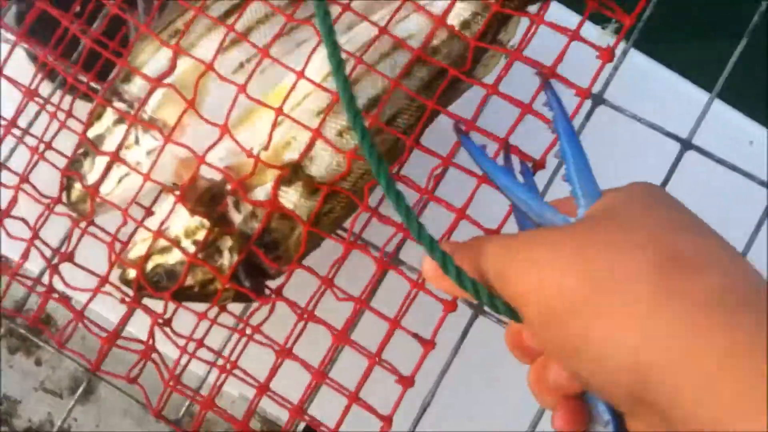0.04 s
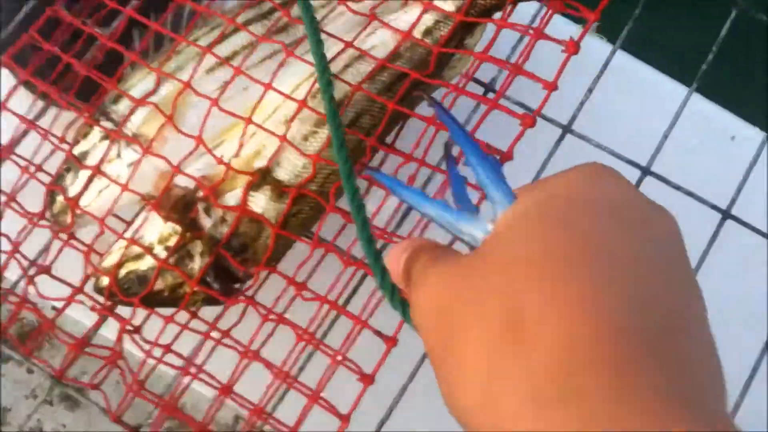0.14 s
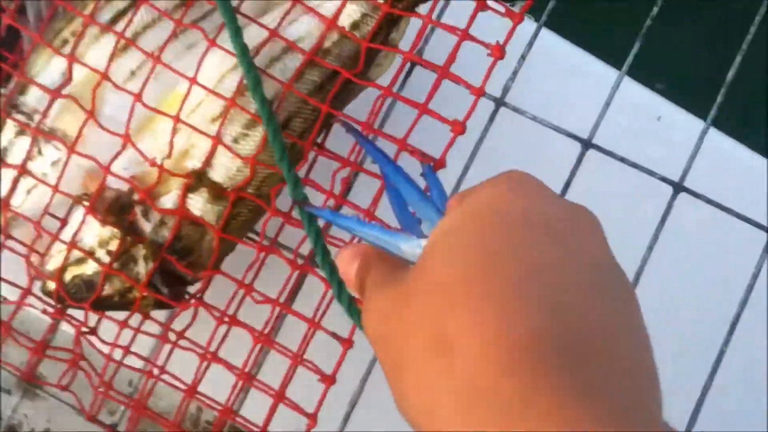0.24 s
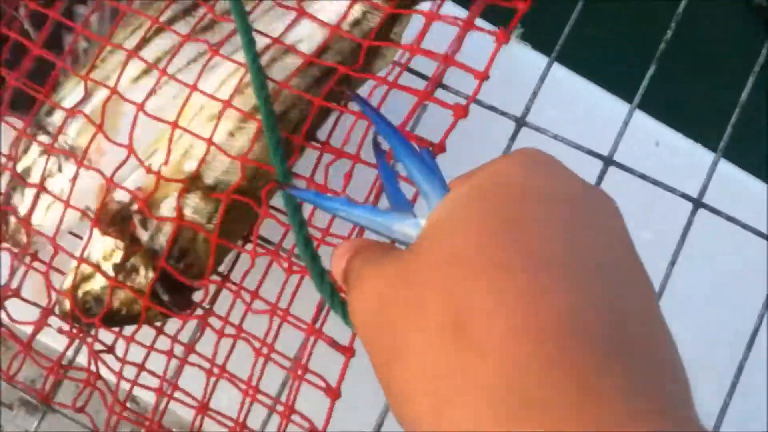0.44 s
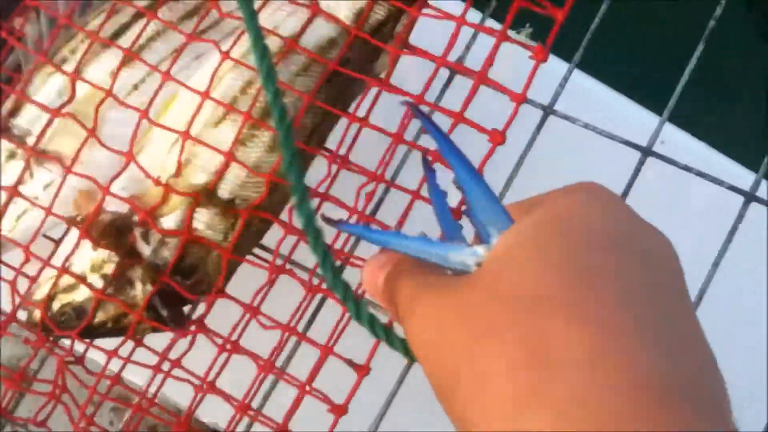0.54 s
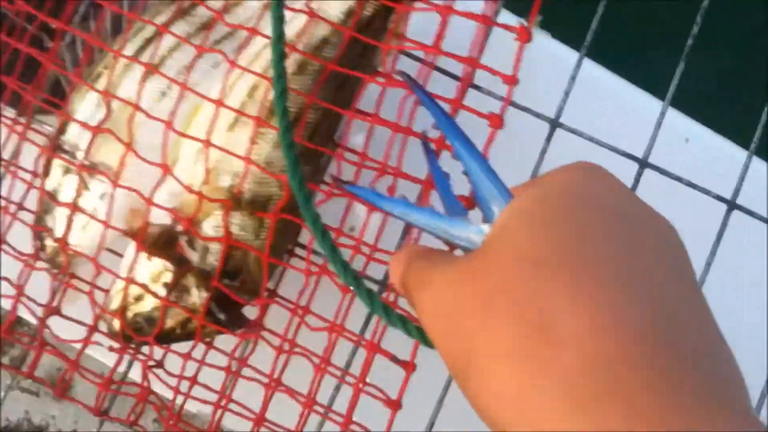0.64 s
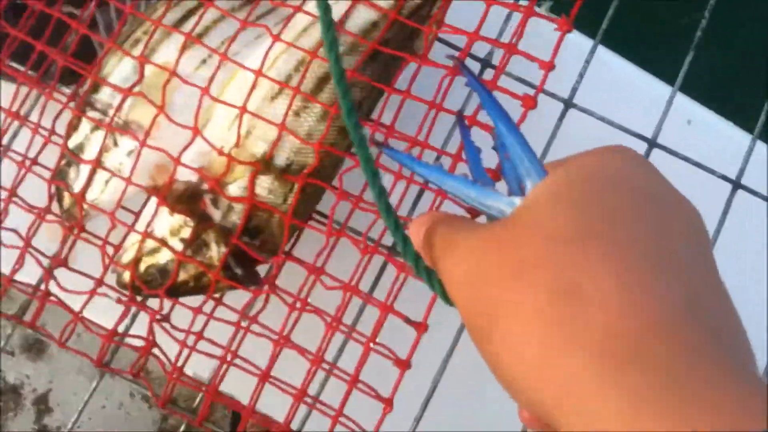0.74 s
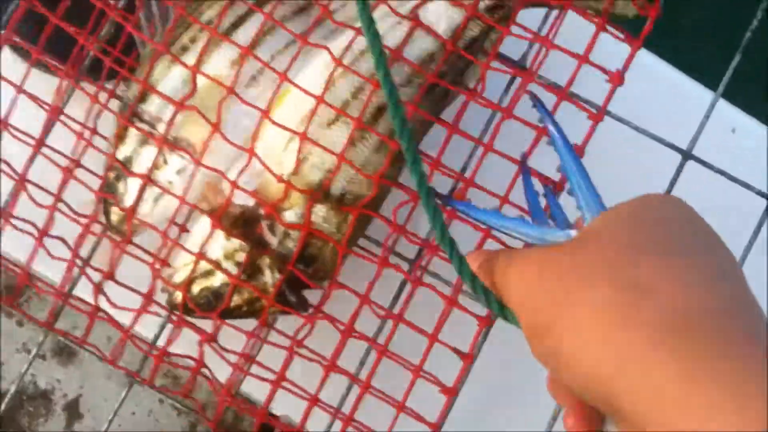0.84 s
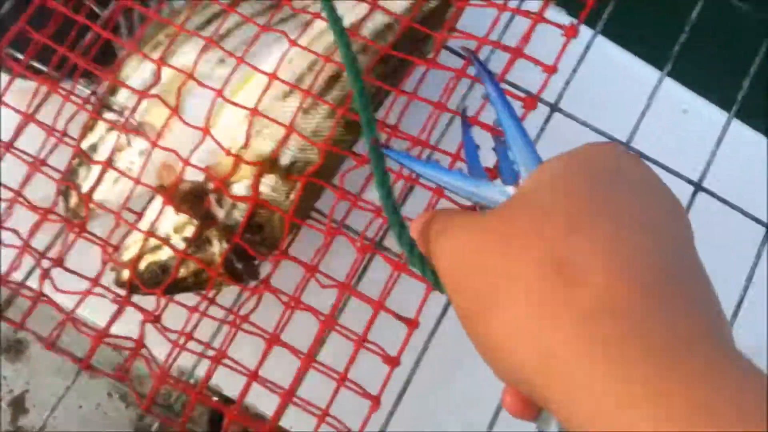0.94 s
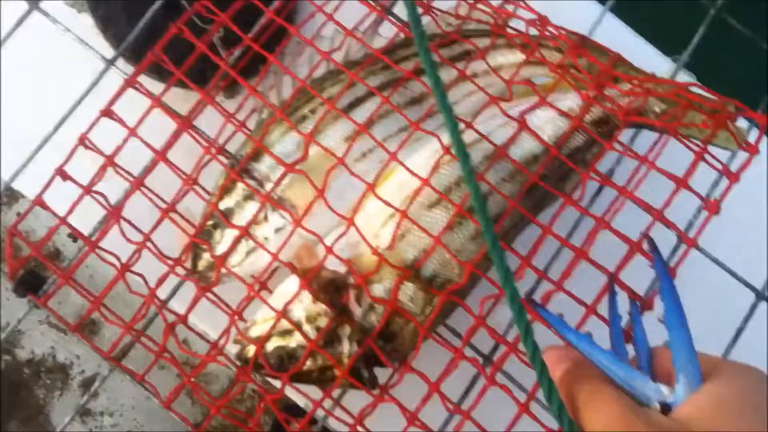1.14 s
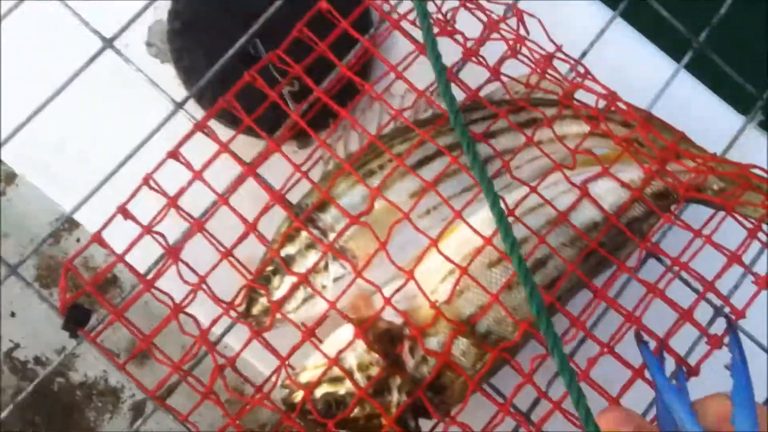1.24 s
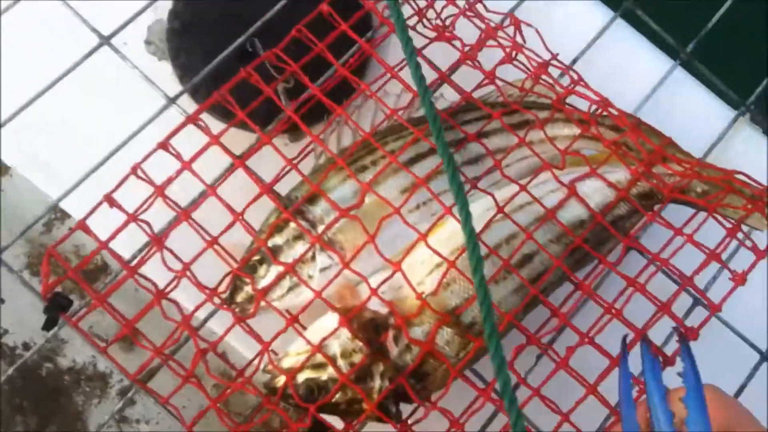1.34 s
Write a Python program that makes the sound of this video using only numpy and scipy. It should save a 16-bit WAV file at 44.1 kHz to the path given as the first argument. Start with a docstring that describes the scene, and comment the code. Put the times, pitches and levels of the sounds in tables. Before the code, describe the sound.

Close, dry clacks and crunchy mesh rattles as a crab is shifted over a hollow lid

```python
"""A hard-shelled crab in a plastic mesh net is shifted by hand on a hollow plastic lid, close to a phone.
Its knocks excite damped modes: clicks and noise ring the shell, and the lid booms a moment later.
Mesh strands rattle in showers of random clicks; claw tips and knots give ticks of a few cycles.
Dragging is shaped noise (rustle, fizz, lid rumble); scrapes are resonant rubbing, and a wire grid
rings when claws catch it. A faint low outdoor hush lies beneath."""
import sys
import numpy as np
from scipy import signal
from scipy.fft import rfft, irfft
from scipy.io import wavfile
from scipy.ndimage import uniform_filter1d

SR = 44100
rng = np.random.default_rng(int(sys.argv[2]) if len(sys.argv) > 2 else 0)


def dump_mix(stems):
    """Bounce the given channels to the path in sys.argv[1] as a 16-bit WAV at rate SR."""
    frames = np.atleast_2d(stems).T  # one column per channel
    limited = np.clip(frames, -1, 1)  # hard clip at full scale
    pcm = np.round(limited * 32767).astype(np.int16)
    wavfile.write(sys.argv[1], SR, pcm)


def how_loud(loudness_db):
    """Turn decibels into a plain amplitude multiplier (0 dB gives 1, 20 dB gives 10)."""
    steps = np.asarray(loudness_db, float) / 20
    return 10 ** steps


N = 61739
SPAN = int(0.3 * SR)  # samples in one event

# modes of the hollow lid: mode_hz, level_db, t60_s
LID = [(156.3, -15.5, 0.37), (255, -9, 0.09), (273.5, -10.5, 0.22), (349.4, 6.5, 0.047),
       (406.2, -14.5, 0.26), (499.8, -14.5, 0.13), (660, -12, 0.057), (889, -14.5, 0.15)]
# modes of the crab's shell: mode_hz, level_db, t60_s
SHELL = [(1398, -2, .04), (1892, -2.5, 0.06), (2096, -2.5, 0.016), (2300, -6, 0.083), (2704, -6.5, 0.051),
         (2952, -4.5, 0.041), (3350, -1.5, 0.023), (3616, 1.5, 0.028), (3903, -4, 0.023), (4313, -2, 0.027),
         (4620, -2.5, 0.015), (5100, 0.5, 0.023), (5800, -7.5, 0.037), (6470, -6, 0.0099)]


def unit(x):
    """Normalisation to an rms value of one."""
    return x / np.sqrt(np.mean(x ** 2) + 1e-30)


def peak(x, db):
    """Normalisation by short-time power: the loudest 4 ms get this rms level."""
    loudest_power = uniform_filter1d(x ** 2, size=176).max()
    return x * how_loud(db) / np.sqrt(loudest_power + 1e-30)


def fade(t60, count=SPAN):
    """Exponential decay, falling 60 dB in t60 seconds."""
    return np.exp(-np.log(1000) * np.arange(count) / SR / max(t60, 1e-4))


def colour(x, table):
    """Spectral shaping: gains in dB interpolated over log frequency."""
    hz = np.fft.rfftfreq(len(x), 1 / SR)
    points = np.array(table)
    gain_db = np.interp(np.log(hz + 1), np.log(points[:, 0]), points[:, 1])
    return irfft(rfft(x) * how_loud(gain_db), len(x))


def band(x, hz, width):
    """Two-pole resonance, its bandwidth a share of the centre frequency."""
    return signal.lfilter(*signal.iirpeak(min(hz, 0.45 * SR), 1 / width, fs=SR), x)


def clicks(count):
    """Random impulse train: dense contacts of random sign and uneven size."""
    per_s, spread_db, top_db = 4000, 3, 9
    chance, side, size = rng.random((count, 3)).T
    size_db = np.minimum(-spread_db * np.log(1 - size), top_db)
    return (chance < per_s / SR) * np.sign(side - 0.5) * how_loud(size_db)


def ring(x, modes):
    """Modal synthesis: damped sines driven by x; each contact point favours other modes."""
    scatter_db, scatter_share = 3, 0.008  # standard deviations of mode level and frequency
    t = np.arange(SPAN) / SR
    scatter = rng.standard_normal((len(modes), 2))
    body = np.zeros(SPAN)
    for (hz, db, t60), (a, b) in zip(modes, scatter):
        sine = np.sin(2 * np.pi * hz * (1 + scatter_share * b) * t)
        body += how_loud(db + scatter_db * a) * fade(t60) / np.sqrt(t60) * sine
    return signal.fftconvolve(x, body)[:len(x)]


def shell(x):
    """Modal density: named shell modes plus the many small resonances of mesh and shell between them."""
    diffuse_db, diffuse_t60_s = -1, 0.014
    dense = band(rng.standard_normal(SPAN), 2020, 1.0) * fade(diffuse_t60_s)
    diffuse = unit(signal.fftconvolve(x, dense)[:len(x)])
    return unit(ring(x, SHELL)) + how_loud(diffuse_db) * diffuse


def flicker(db, per_s, count):
    """Random amplitude modulation: slewed random level steps that make a layer uneven."""
    step = int(SR / per_s)
    levels = np.repeat(rng.standard_normal(N // 100), step)[:count]
    return how_loud(db * uniform_filter1d(levels, size=step // 2))


def add(out, s, x):
    """Linear superposition of one event, starting at s seconds."""
    i = max(int(s * SR), 0)
    out[i:i + SPAN] += x[:N - i]


def drag():
    """Friction noise of the dragged net: mesh rustle and fizz over a lid damped by the weight on it."""
    # course of the dragging: time_s, rustle_db, rumble_db, fizz_db
    course = np.array([(0.0, -50, -61.5, -77), (0.198, -69.5, -52.5, -63.5), (0.276, -53, -53.5, -69),
                       (0.368, -76.5, -67, -63.5), (0.459, -34.5, -38.5, -57), (0.531, -45.5, -56, -54.5),
                       (0.59, -58, -39.5, -55.5), (0.699, -47.5, -38.5, -57.5), (0.781, -48, -47.5, -56.5),
                       (0.86, -90, -73, -74), (0.964, -53, -57, -76), (1.127, -51.5, -50.5, -72),
                       (1.279, -63.5, -55, -62), (1.4, -65.5, -65, -76)])
    # spectrum of the mesh rustle: frequency_hz, level_db (per Hz)
    rustle_tone = [(290, -31), (500, -2.5), (1270, 1), (2060, -3), (2440, -1.5), (4680, -7), (9000, -27.5),
                   (11700, -69), (19800, -120)]
    # spectrum of the fine treble fizz: frequency_hz, level_db (per Hz)
    fizz_tone = [(3530, -25), (6000, -3.5), (10200, -9.5), (14300, -1), (16200, 0), (16500, -48)]
    t = np.arange(N) / SR
    rustle = unit(colour(rng.standard_normal(N) + 1.4 * unit(clicks(N)), rustle_tone))
    fizz = unit(colour(rng.standard_normal(N) + 1.4 * unit(clicks(N)), fizz_tone))
    fizz = fizz * flicker(2.5, 40, N)  # dB, steps per second
    # the loaded lid rings shorter, with its mode levels drawn together
    loaded_lid = [(hz, 0.81 * db, 0.77 * t60) for hz, db, t60 in LID]
    rumble = unit(ring(rng.standard_normal(N), loaded_lid))
    out = np.zeros(N)
    for layer, level_db in zip((rustle, rumble, fizz), course.T[1:]):
        out += how_loud(np.interp(t, course[:, 0], level_db)) * layer
    return out


def air():
    """Stationary shaped noise: a faint low outdoor hush."""
    # spectrum of the hush: frequency_hz, level_db (per Hz)
    air_tone = [(20, 1), (60, 16), (110, 1), (200, 7), (600, -26), (1200, -59)]
    return how_loud(-61.5) * unit(colour(rng.standard_normal(N), air_tone))


def rattles():
    """Stick-slip of strands over shell: a shower of clicks, partly ringing the shell."""
    # showers of mesh clicks: start_s, level_db, centre_hz, hold_s, t60_s
    showers = [(.001, -43, 3320, 0.011, 0.039), (0.075, -54, 12200, 0.0058, 1),
               (0.424, -18, 4930, 0.015, 0.2), (0.531, -34, 13300, 0.0066, 0.13),
               (0.591, -51, 8900, 0.0018, 0.036), (0.647, -35, 5100, 0.0082, 0.15),
               (0.688, -46, 14300, 0.008, 0.054), (0.883, -23.5, 4140, 0.029, 0.17),
               (1.026, -56, 10700, 0.0038, 0.045), (1.041, -31, 5070, 0.001, 0.015),
               (1.134, -42.5, 5250, 0.0029, 0.28)]
    rise_s, snap, snap_s = 0.0004, 0.69, 0.023
    strands_db, strands_width = -1, 0.57  # level re the body, bandwidth as a share of the centre
    treble_fade = 0.4  # the strands' treble dies in this share of the time
    t = np.arange(SPAN) / SR
    onset = np.minimum(t / rise_s, 1) * (1 + snap * np.exp(-t / snap_s))  # first strands let go hardest
    out = np.zeros(N)
    for s, db, hz, hold, t60 in showers:
        env = how_loud(-60 * np.maximum(t - hold, 0) / t60) * onset
        shower = unit(clicks(SPAN)) + rng.standard_normal(SPAN)
        shower = shower * flicker(4, 250, SPAN)  # uneven lumps: dB, steps per second
        # showers centred above 4500 Hz ring the shell less
        body = unit(shell(band(shower * env, hz, 1.0))) * min(4500 / hz, 1) ** 2
        strands = unit(band(shower * env ** (1 / treble_fade), hz, strands_width))
        add(out, s, peak(body + how_loud(strands_db) * strands, db))
    return out


def ticks():
    """Short wave packets: a few cycles at each tick's pitch with a broadband noise edge."""
    # lone ticks of a claw tip or knot: start_s, level_db, pitch_hz, edge_db (broad edge)
    tick_table = [(.0474, -45.5, 3380, -7), (0.0765, -46.5, 3170, -20), (0.099, -45, 3780, -4),
                  (.240, -51, 8500, 1), (0.598, -42, 7000, -14), (0.6124, -31, 4950, -8),
                  (0.617, -17, 3680, -17), (0.615, -30.5, 5450, -10), (0.778, -40, 3400, -10),
                  (1.083, -48, 8960, 1), (1.150, -40, 3350, -30), (1.286, -59, 3680, -17),
                  (1.297, -54, 5800, -13), (1.322, -47.5, 3300, -14)]
    cycles = 3
    out, t = np.zeros(N), np.arange(SPAN) / SR
    for s, db, hz, edge_db in tick_table:
        n = t * hz / cycles
        edge = how_loud(edge_db) * np.diff(rng.standard_normal(SPAN + 1))  # differencing favours the treble
        packet = (np.sin(2 * np.pi * hz * t) + edge) * n * np.exp(-2 * n ** 2)
        add(out, s, peak(packet, db))
    return out


def scrapes():
    """Friction-driven resonance: rubbing swells and dies, singing in modes near its centre."""
    # slow scrapes of shell along the mesh: start_s, length_s, level_db, strongest_hz
    scrape_table = [(0.116, 0.032, -52.5, 4150), (0.138, 0.049, -48.5, 3870), (.15, 0.051, -47.5, 2270),
                    (0.184, 0.05, -42, 945), (1.221, 0.054, -49, 1310)]
    width = 0.35  # share of the centre frequency
    out, t = np.zeros(N), np.arange(SPAN) / SR
    for s, length, db, hz in scrape_table:
        rub = unit(clicks(SPAN)) * np.sin(np.pi * np.minimum(t / length, 1))
        song = ring(rub, SHELL + LID)
        song = band(band(song, hz, width), hz, width)
        add(out, s, peak(song, db))
    return out


def knocks():
    """Impact excitation: a crack, a dying clatter through the shell, and the lid booming a moment later."""
    # knocks of shell on the lid: start_s, clack_db, boom_db (re clack), strongest_hz, clatter_t60_s
    knock_table = [(0.170, -45.5, 5, 2340, 0.64), (.222, -31.5, -6.5, 3300, 0.13),
                   (0.3584, -27.5, -11, 3700, 0.073), (.374, -29.5, 0, 2590, 0.12),
                   (0.4566, -17, -12, 5150, 0.083), (.531, -40.5, -15, 1800, .05),
                   (0.5652, -27, -10.5, 3650, 0.18), (.602, -30.5, -0.5, 4200, 0.24),
                   (0.631, -30, -6.5, 4120, 0.15), (0.671, -28.5, -5.5, 2450, 0.15),
                   (0.7322, -42, -10, 3500, 0.19), (0.7933, -31.5, 1.5, 4100, 0.15),
                   (0.921, -33.5, 1.5, 1130, 0.22), (1.0448, -24.5, -6, 3200, 0.17),
                   (1.2213, -37.5, -7.5, 3260, 0.22)]
    crack_s, boom_rise_s, boom_rub_db = 0.0012, 0.003, -8
    clack_width, clack_broad_db = 0.5, -7  # bandwidth as a share of the centre, unpeaked part
    low_cut = signal.butter(2, 900, "high", fs=SR)
    top_cut = signal.butter(4, 9340, fs=SR, output="sos")
    out, t = np.zeros(N), np.arange(SPAN) / SR
    for s, db, boom_db, hz, t60 in knock_table:
        clatter = unit(clicks(SPAN)) * fade(t60)
        crack = rng.standard_normal(SPAN) * np.exp(-t / crack_s)
        clack = peak(shell(clatter + 3.3 * crack), 0) + peak(crack, 0)
        clack = signal.sosfilt(top_cut, signal.lfilter(*low_cut, clack))
        clack = band(clack, hz, clack_width) + how_loud(clack_broad_db) * clack
        blow = (t == 0) + how_loud(boom_rub_db) * clatter / 30  # one impulse, then rubbing
        boom = ring(blow, LID) * (1 - np.exp(-t / boom_rise_s)) ** 2
        add(out, s, peak(clack, db) + peak(boom, db + boom_db))
    return out


def wires():
    """Free vibration of wires after a short push of clicks."""
    # claws catching the wire grid that lies on the lid: start_s, level_db
    catches = [(0.359, -42), (0.568, -39.5), (1.047, -34.5), (1.227, -53.5)]
    # modes of the grid: mode_hz, level_db, t60_s
    wire_modes = [(1124, 4, .1), (1865, -7, 0.23), (2255, -11.5, 0.15)]
    out = np.zeros(N)
    for s, db in catches:
        push = clicks(SPAN) * fade(0.023)
        add(out, s, peak(ring(push, wire_modes), db))
    return out


def scene():
    """Superposition of all sources in one channel."""
    mix = drag() + air() + rattles() + ticks() + scrapes() + knocks() + wires()
    return mix[None]


def roll_off(x):
    """The treble ends steeply here."""
    return signal.sosfilt(signal.butter(12, 16820, fs=SR, output="sos"), x)


def record(dry):
    """Band limiting: the phone trims the deep bass and the very top."""
    bass_cut = signal.butter(4, 115, "high", fs=SR, output="sos")
    top_cut = signal.cheby2(8, 30, 16000, fs=SR, output="sos")
    mix = signal.sosfilt(bass_cut, dry) + how_loud(-19.5) * dry  # some deep bass remains
    mix = signal.sosfilt(top_cut, mix)
    return roll_off(mix)


dry = scene()
out = record(dry)
dump_mix(out)
```